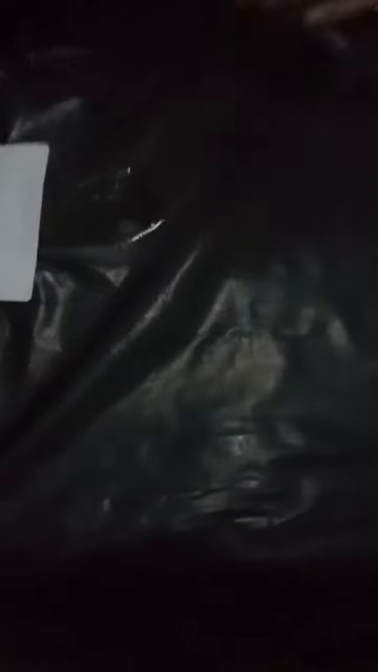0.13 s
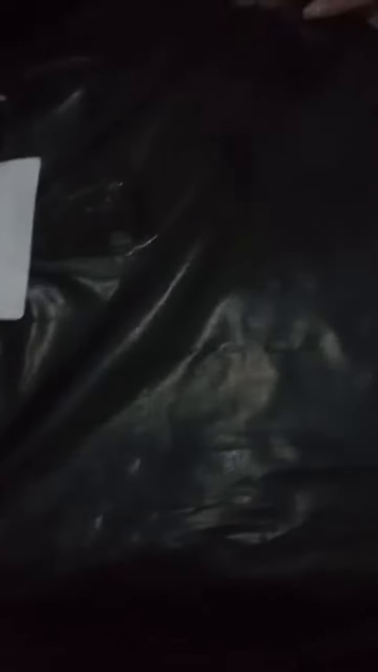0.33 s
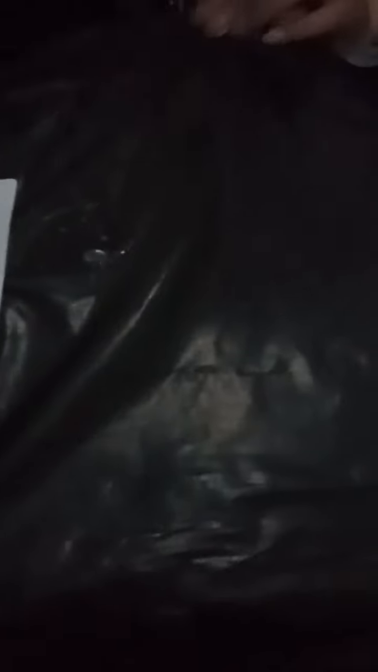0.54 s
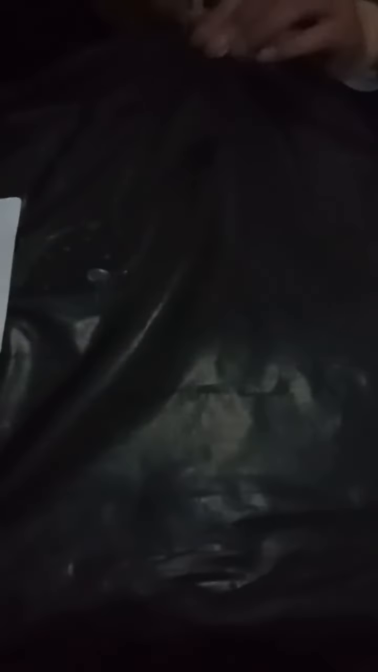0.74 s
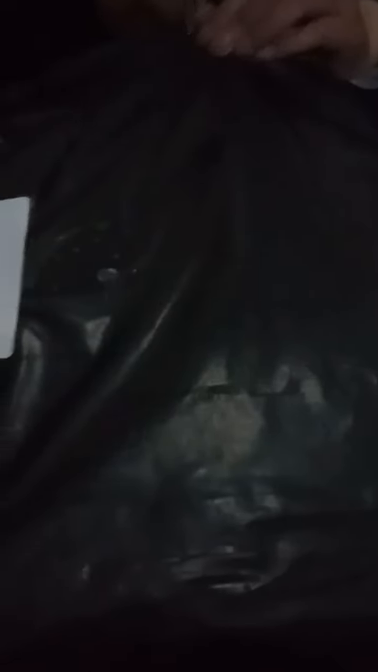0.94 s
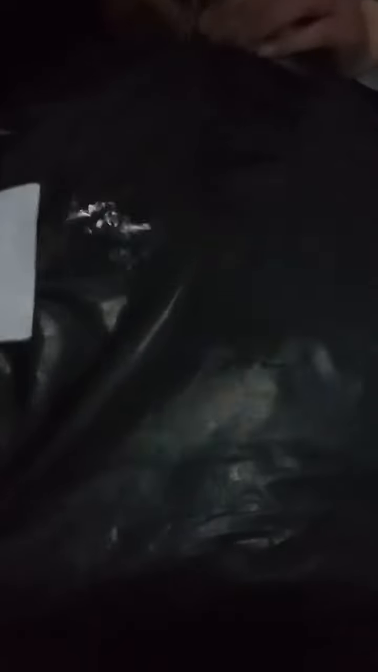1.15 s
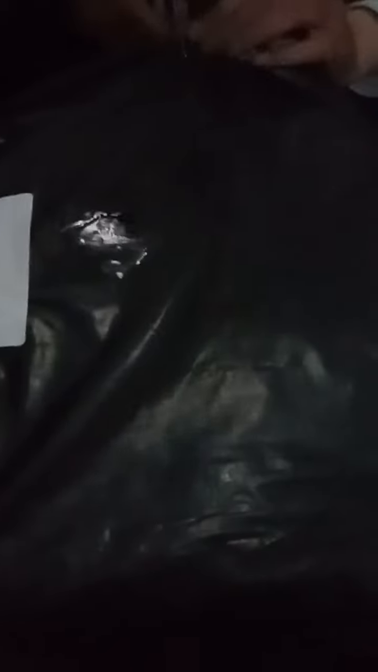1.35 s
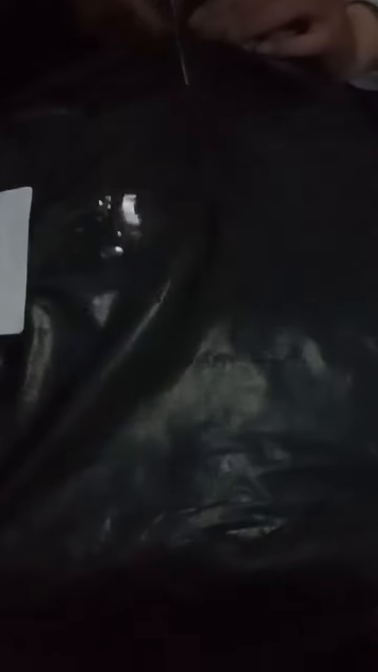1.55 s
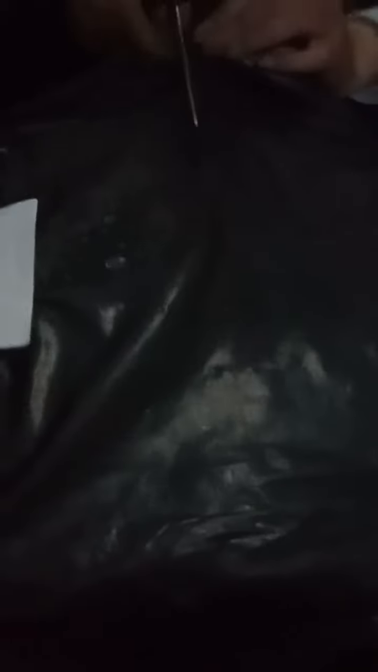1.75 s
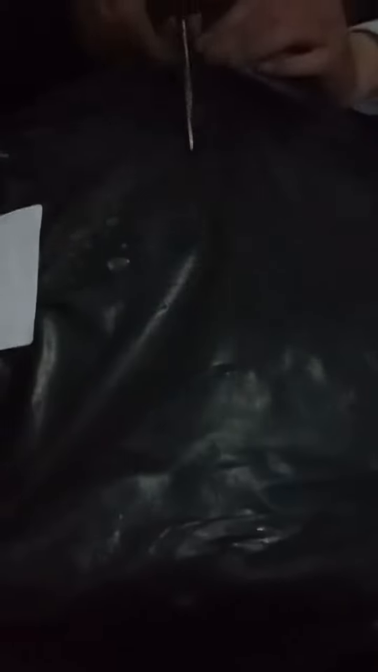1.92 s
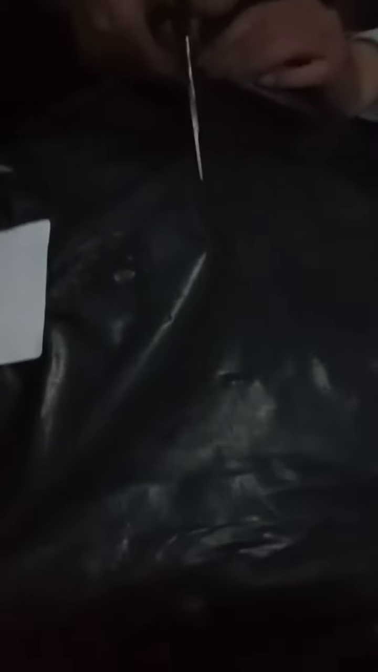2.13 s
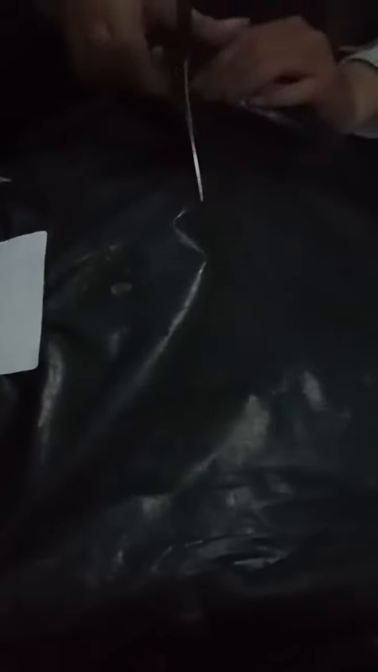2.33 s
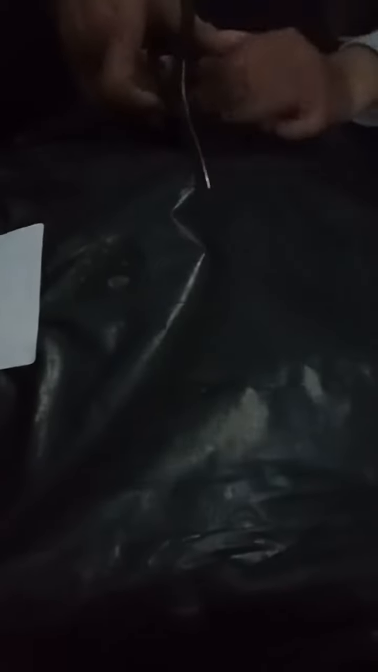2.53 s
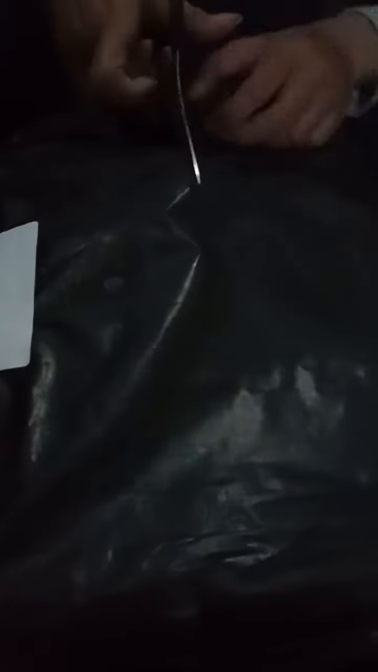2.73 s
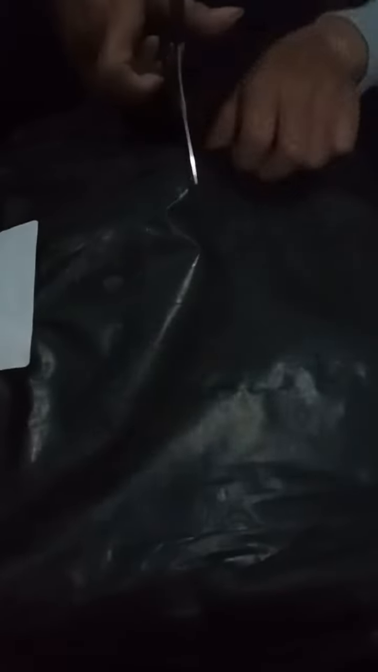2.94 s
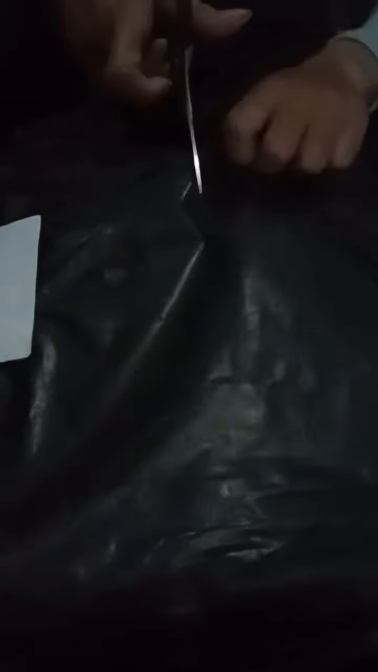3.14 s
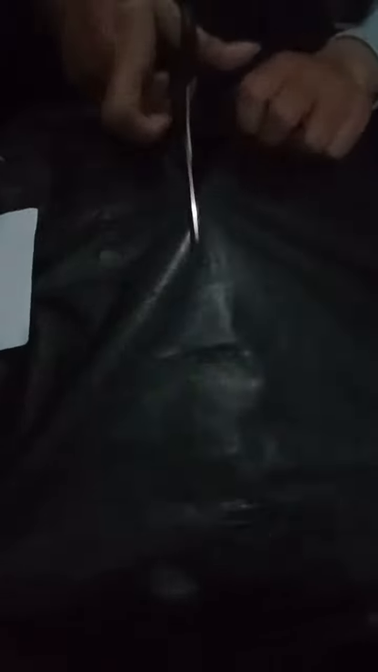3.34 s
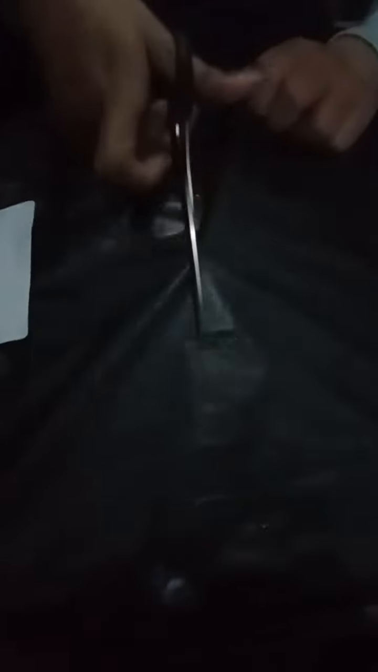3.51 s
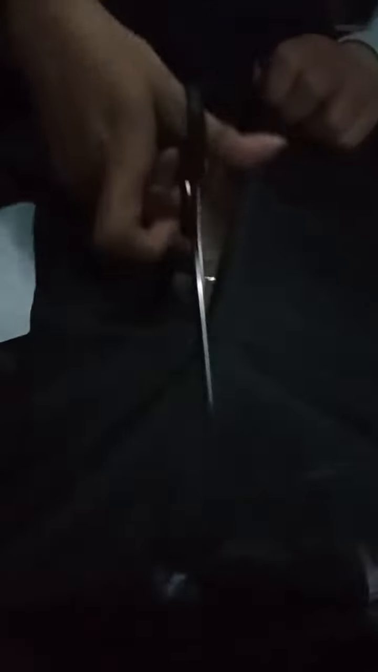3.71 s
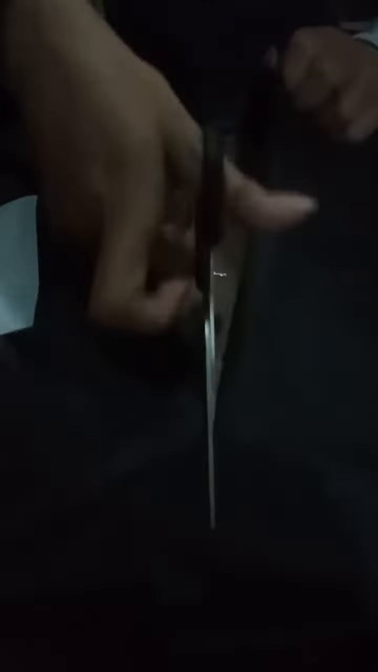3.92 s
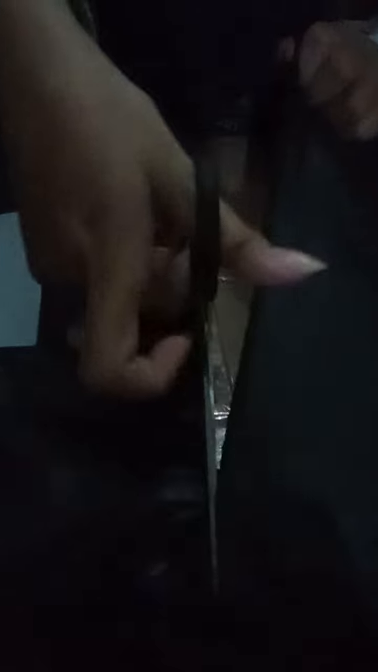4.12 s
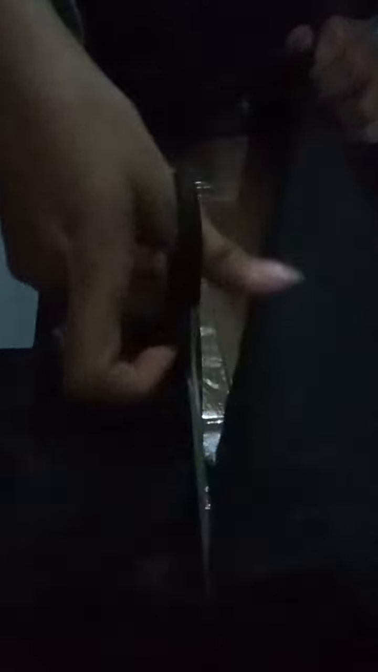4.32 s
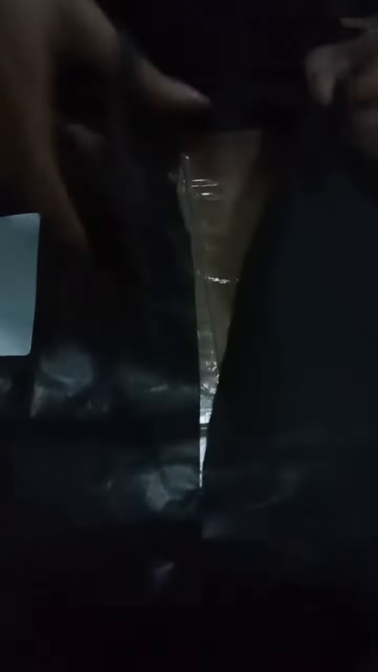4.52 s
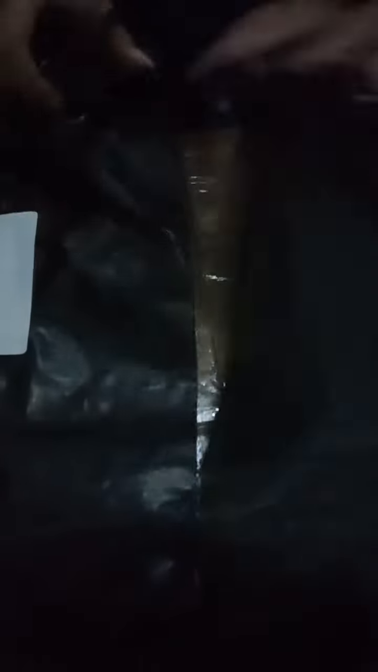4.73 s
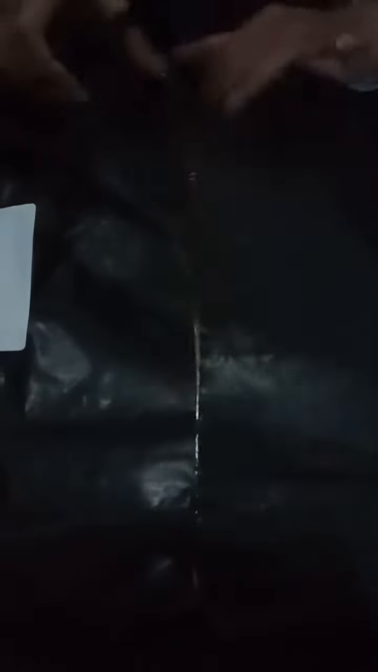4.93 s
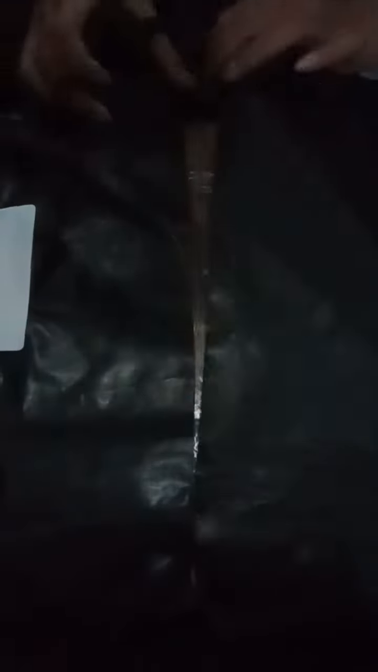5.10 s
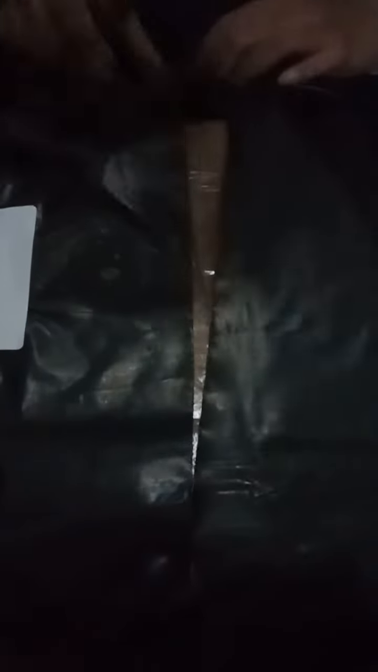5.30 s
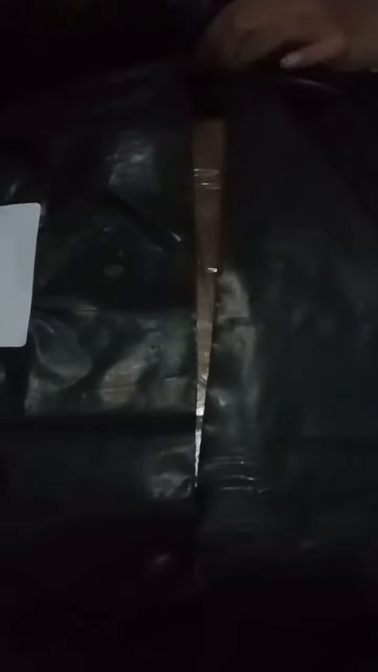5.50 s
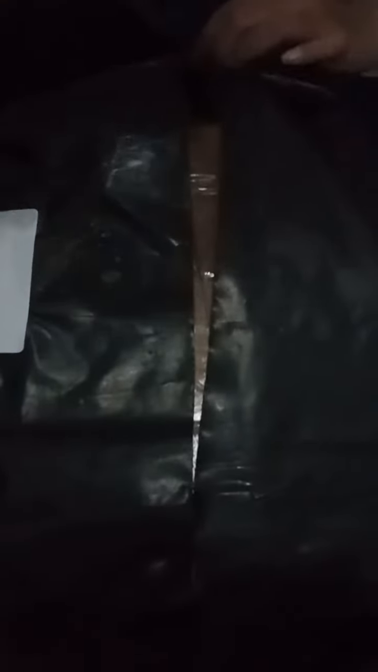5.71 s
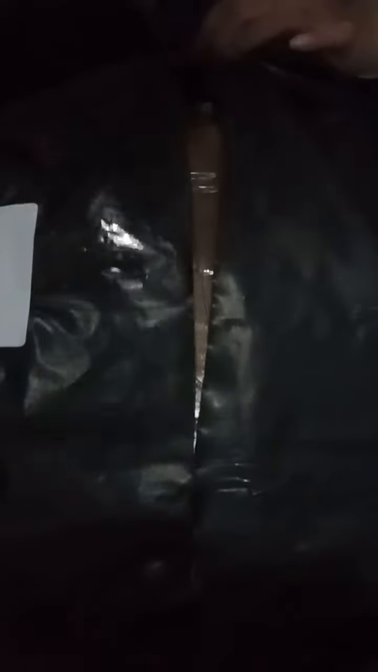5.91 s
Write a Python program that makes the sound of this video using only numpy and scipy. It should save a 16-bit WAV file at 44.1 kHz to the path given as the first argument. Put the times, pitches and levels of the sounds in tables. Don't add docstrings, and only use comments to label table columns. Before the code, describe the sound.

Crisp, high plastic crinkling in a quiet room, dry and close. First small ticks and scattered snaps from handling, a sharper burst after one second, then uneven snips of scissors. The cut runs on into a smooth hiss with thick crackle, loudest past the middle, with light taps and faint low thuds from the parcel and table. Crackles thin out, nearly stop, then briefly return.

```python
import sys
import numpy as np
from scipy import signal
from scipy.fft import rfft, irfft, next_fast_len
from scipy.io import wavfile
from scipy.ndimage import uniform_filter1d

SR = 44100
rng = np.random.default_rng(int(sys.argv[2]) if len(sys.argv) > 2 else 0)


def materialize(psi):
    bounded = np.clip(np.atleast_2d(psi).T, -1, 1)
    quanta = np.round(bounded * 32767).astype(np.int16)
    wavfile.write(sys.argv[1], SR, quanta)


def convert_level_to_amplitude(level_db):
    exponent = np.asarray(level_db, float) / 20
    return 10 ** exponent


N = 267025

# start in
# seconds, length in seconds, crackle level at the start in dB, at the end in dB.
MOVES = [(0, 0.12, -36.5, -69), (0.124, 0.18, -40.5, -43), (0.355, 0.12, -59, -52.5),
         (0.46, 0.15, -40.5, -53), (0.557, 0.26, -51, -68), (0.79, 0.11, -64, -62.5),
         (0.923, 0.059, -63.5, -66), (1.098, 0.089, -32.5, -28.5), (1.216, 0.1, -47, -54),
         (1.409, .02, -69, -70), (1.451, 0.041, -27, -33.5), (1.629, 0.25, -56, -41.5),
         (1.928, 0.096, -39, -34), (2.056, 0.055, -35, -36), (2.142, 0.035, -57, -44.5),
         (2.164, 0.14, -55, -62.5), (2.39, 0.15, -46, -36), (2.552, 0.14, -32.5, -38.5),
         (2.737, 0.19, -55.5, -59.5), (2.91, 0.083, -38.5, -35.5), (2.985, 0.046, -41, -42.5),
         (3.084, .19, -44, -31.5), (3.265, 0.11, -36.5, -34), (3.368, 0.19, -37, -35),
               (3.533, 0.16, -32.5, -44.5), (3.606, 0.27, -40.5, -39.5), (3.724, 0.06, -32, -36),
               (3.804, 0.2, -35, -24.5), (3.989, 0.11, -30.5, -29.5), (4.1, 0.09, -47.5, -49),
               (4.191, 0.11, -24, -44.5), (4.244, 0.22, -41, -35.5), (4.376, 0.21, -28.5, -32.5),
               (4.589, 0.12, -47.5, -40.5), (4.738, 0.084, -41.5, -30), (4.865, 0.087, -35.5, -37),
               (4.952, 0.069, -34, -36), (5.063, 0.11, -54, -26), (5.13, 0.14, -28, -36),
               (5.241, 0.2, -37, -37), (5.518, 0.025, -71, -62.5), (5.655, .012, -68, -64),
               (5.751, 0.017, -66, -71), (5.82, 0.18, -58.5, -58), (5.961, 0.078, -43.5, -37)]
RISE_DB_PER_S, FALL_DB_PER_S, STILL_DB = 1503, 423, -75
TAIL_DB, TAIL_DB_PER_S = -17, 330
GATE_DB, GATE_STEEPENS = -63, 2.5

# time in seconds, rub over the grains in dB.
GLIDE = [(1.75, -6.5), (1.81, 2.5), (1.93, -6), (3.1, -5), (3.3, -2), (3.45, 5), (3.7, 13), (3.8, -1.5),
         (4.2, -8.5), (5.8, -5.5), (5.86, 3), (5.97, -5)]
MOTTLE_DB = 4.5
# frequency in Hz, level in dB per Hz.
FILM = [(590, -16), (1000, -11), (1330, -3), (1700, -6), (3630, -0.5), (4930, -4), (7010, 0.5), (10200, -8),
        (12900, -24.5), (13800, -19.5), (15000, -33.5), (15600, -18.5), (16100, -41.5)]

# time in seconds, rms level of the snap's opening in dB, crease
# pitch in Hz, length in ms.
GRIP_SNAPS = [(.0152, -38.5, 7420, 1.1), (.0351, -44.5, 4170, 0.25), (.1368, -34.5, 8700, 0.87),
              (.2045, -34.5, 3590, 2.5), (.2314, -28, 7450, 2.8), (.2754, -30, 3690, 0.66),
              (.2836, -33.5, 3520, 1.7), (.3814, -47, 10100, 1.7), (.4018, -48.5, 3890, 0.61),
              (.4265, -40.5, 8200, 1.5), (.4617, -29.5, 8170, 0.079), (.5093, -35, 7300, 0.27),
              (.541, -29.5, 8100, 1), (.5503, -32.5, 8900, 1.7), (.5691, -25.5, 9700, 0.25),
              (.6, -39, 7220, 2.1), (.6292, -40, 3420, 1.4), (.6695, -43, 3900, 0.15),
              (.7036, -35, 7000, 1.04), (.8097, -34, 4120, 0.51), (.8689, -45, 7200, 0.27),
              (.9351, -59.5, 3720, 0.4), (1.0828, -20.5, 6950, 0.38), (1.187, -28.5, 6540, 1),
              (1.1805, -29.5, 6370, 0.52), (1.1972, -20.5, 7520, 0.4), (1.2597, -45.5, 6180, 1.2),
              (1.2825, -37, 7230, 2.6), (1.3022, -30.5, 7510, 0.73), (1.3206, -35.5, 3690, 0.18)]
# time in seconds, rms level of the snap's opening in dB, crease pitch in Hz, length
# in ms.
SNIP_SNAPS = [(1.435, -34, 5470, 1.1), (1.442, -27, 7410, 14), (1.4849, -22.5, 7940, 0.56),
              (1.494, -29, 7000, 4), (1.6679, -46, 6910, 0.41), (1.7761, -28.5, 7550, 0.85),
              (1.8538, -38, 7130, 1.3), (1.859, -27.5, 8720, 2.1), (1.8947, -37, 9330, 6.8),
              (1.9366, -16, 8120, 0.12), (1.973, -31.5, 10210, 3.5), (2.023, -30, 8660, 1.3),
              (2.0534, -22, 7830, 0.65), (2.0857, -31, 7670, 0.34), (2.0948, -30, 3950, 0.85),
              (2.1065, -21.5, 4660, 0.3), (2.1125, -26, 7630, 1.7), (2.1227, -33, 7050, 2.4),
              (2.1642, -43.5, 3980, 0.78), (2.2409, -47.5, 7100, 1.1), (2.2695, -45.5, 4400, 0.9),
              (2.2736, -45.5, 2347, 1.3), (2.2958, -50.5, 6700, 1.9)]
# time in seconds, rms level of the snap's opening in dB, crease pitch in Hz,
# length in ms.
TAUT_SNAPS = [(2.454, -30.5, 7100, 0.23), (2.4921, -21, 10500, 0.5), (2.499, -24.5, 7360, 2.2),
              (2.5448, -27, 7110, 3.5), (2.6244, -28.5, 7760, 1.1), (2.6378, -28.5, 7140, 1.5),
              (2.7072, -21, 7230, 0.21), (2.7688, -36, 3790, 0.6), (2.8133, -52.5, 6550, 1.3),
              (2.968, -24.5, 4410, 0.29), (3.0294, -23.5, 6870, 0.37), (3.097, -34, 8660, 1.4),
              (3.105, -35.5, 6650, 0.89), (3.1243, -28, 8790, 2.2), (3.145, -32, 7790, 1.2),
              (3.1824, -33, 8100, 0.47), (3.3458, -20, 7000, 1.9), (3.497, -18.5, 7130, 0.049),
              (3.712, -22.5, 8300, 5.5), (3.7613, -13.5, 7750, 0.49), (3.7775, -18.5, 7530, 0.66),
              (3.8, -21, 3900, 0.44), (3.8075, -24, 5470, 0.8), (3.8335, -22, 6820, 0.49),
              (3.8713, -19, 3450, 2.6), (3.888, -24.5, 7320, 9.4)]
# time in seconds, rms level of the snap's opening in dB, crease pitch in Hz,
# length in ms.
SLIDE_SNAPS = [(3.915, -23, 7320, 0.34), (3.9727, -17, 7220, 0.45), (3.9851, -19.5, 7070, 1.4),
               (3.993, -16.5, 6900, 0.52), (4.0208, -17, 7210, 0.62), (4.0519, -17.5, 8080, 0.35),
               (4.08, -16.5, 7520, 0.81), (4.1399, -34, 3710, 1.6), (4.1494, -36, 1122, 0.48),
               (4.184, -23.5, 4900, 12), (4.189, -16, 7360, 7.9), (4.2276, -23.5, 7110, 0.63),
               (4.2786, -28, 8050, 0.49), (4.3368, -24.5, 5380, 1.6), (4.3561, -23.5, 3763, 1.8),
               (4.3685, -21.5, 6580, 1.2), (4.387, -20.5, 6660, 0.92), (4.4023, -14.5, 7690, 1.2),
               (4.4133, -21.5, 3830, 2.5), (4.4306, -14, 7430, 0.63), (4.473, -21, 7000, 0.32),
               (4.5106, -18.5, 5340, 0.62), (4.5273, -24.5, 5220, 2.2), (4.55, -20.5, 7620, 0.68),
               (4.578, -29.5, 7340, 1.8)]
# time in seconds, rms level of the snap's opening in dB, crease pitch in Hz, length
# in ms.
OPEN_SNAPS = [(4.6402, -38, 7440, 0.47), (4.6649, -23.5, 6980, 2.2), (4.6884, -25.5, 6870, 0.67),
              (4.704, -28, 4000, 0.18), (4.7476, -27, 6770, 2.4), (4.7679, -26, 7840, 2.1),
              (4.8279, -33, 5320, 2.1), (4.8725, -23.5, 7600, 1.2), (4.9336, -32.5, 5690, .49),
              (4.9489, -30, 7880, 2.2), (4.999, -25, 9030, 0.64), (5.108, -36, 2465, .67),
              (5.145, -28.5, 5980, 9.3), (5.1752, -22.5, 4000, 0.4), (5.1887, -17, 7760, 0.57),
              (5.2183, -22.5, 7390, 0.25), (5.2537, -31.5, 7280, 0.5), (5.3739, -25, 9950, 0.32),
              (5.4, -28, 8480, 0.64), (5.4355, -22, 5410, 2.5), (5.4847, -32, 6400, 0.29),
              (5.5244, -50, 7180, 4), (5.6545, -54.5, 6800, 2), (5.792, -63.5, 8970, .64),
              (5.8255, -44.5, 3660, 0.62), (5.88, -45.5, 9720, 1.5), (5.9605, -42, 7340, 2.2),
              (5.9897, -32.5, 8300, 0.74), (6.0131, -25, 8460, 1.5), (6.041, -32, 3790, 0.77)]
# time in seconds,
# rms level of the tick's opening in dB, crease pitch in Hz.
TICKS = [(0.06, -57.5, 6860), (0.088, -54.5, 3750), (0.1098, -44.5, 8000), (0.148, -38.5, 4000),
         (0.166, -33, 9800), (0.215, -40, 3000), (0.241, -36.5, 3400), (0.2569, -48.5, 3530),
         (0.272, -41, 7530), (0.2914, -40, 4090), (0.3102, -52.5, 7410), (0.3294, -46, 3450),
         (0.3446, -51, 3040), (0.374, -51, 6780), (0.485, -33, 6880), (0.5586, -34.5, 3330),
         (0.641, -44.5, 3846), (0.66, -45.5, 3690), (0.6867, -57.5, 3380), (0.8833, -48.5, 9680),
         (0.9496, -60, 8600), (1.1308, -29.5, 7800), (1.137, -33, 7030), (1.1696, -22.5, 8130),
         (1.2448, -45.5, 5800), (1.4162, -63.5, 7030), (1.4717, -32.5, 7780), (1.7067, -44, 6600),
         (1.7354, -50.5, 4480), (1.7681, -40, 8890), (1.8464, -38, 7520), (2.071, -26.5, 8550),
         (2.152, -48, 3850), (2.2226, -45, 7050), (2.3674, -62.5, 4000), (2.442, -38.5, 3800),
         (2.4736, -43, 3790), (2.5134, -35.5, 6860), (2.5791, -27, 7500), (2.5934, -30.5, 7090),
         (2.6547, -33.5, 7280), (2.701, -29.5, 7700), (2.7484, -45.5, 4200), (2.7616, -37, 7310),
         (2.8639, -51.5, 3480), (2.896, -44.5, 6290), (2.9302, -35.5, 7070), (2.9626, -40.5, 3405),
         (2.983, -32.5, 5970), (3.0199, -35.5, 5900), (3.0615, -43.5, 2690), (3.0665, -40.5, 5300),
         (3.0901, -44, 6800), (3.1509, -30.5, 4310), (3.1895, -35, 2900),
         (3.2437, -29, 8600), (3.2619, -29, 7000), (3.3031, -28.5, 5190), (3.3183, -27.5, 7630),
              (3.3225, -29, 7500), (3.4318, -30, 2090), (3.4438, -25.5, 8300), (3.569, -20.5, 7200),
              (3.5755, -31.5, 6600), (3.7511, -36, 6200), (3.884, -24.5, 3600), (3.9524, -20, 6630),
              (4.0047, -24, 7400), (4.0262, -18.5, 7000), (3.4835, -33, 4700), (4.0651, -22.5, 8400),
              (4.0701, -31.5, 3470), (4.1098, -41.5, 6300), (4.1275, -45, 3600), (4.3018, -35, 6580),
              (4.3155, -36, 7100), (4.3497, -23.5, 8100), (4.3834, -22.5, 7900), (4.4622, -27.5, 7400),
              (4.4931, -32.5, 7000), (4.5999, -41, 7240), (4.6301, -42, 3600), (4.6485, -33.5, 6600),
              (4.7895, -33, 6320), (4.7974, -34.5, 7100), (4.8057, -33.5, 7500), (4.8119, -36, 7700),
              (4.8386, -30, 6500), (4.8887, -37, 7200), (4.9154, -35, 8700), (5.0112, -36, 6660),
              (5.204, -33, 3600), (5.2504, -38.5, 7510), (5.2651, -34, 8250), (5.3499, -35, 7100),
              (5.3711, -37, 7100), (5.3844, -27.5, 8520), (5.4303, -27.5, 7300), (5.4545, -37, 7180),
              (5.4767, -43, 7000), (5.6273, -70.5, 7560), (2.683, -35.5, 2300), (5.8396, -43, 5700),
              (5.9137, -46, 4300), (5.9451, -44, 10200), (5.9745, -40, 6090), (6.0179, -35.5, 7650)]
TICK_MS = 0.99

# frequency in Hz, time to fall 60 dB in
# seconds.
RIDGE = [(1290, 0.046), (1450, 0.053)]
# time in seconds, level in dB.
RIDGE_LEVEL = [(0.9, -70), (1.7, -68), (4.3, -69), (5.2, -76)]

POCKET_HZ = [307, 430, 602.5, 737, 806, 925]
# start in seconds, length in seconds, level in dB, pocket pitch in Hz.
SQUEEZES = [(0, 0.028, -67, 890), (0.133, 0.11, -57, 730), (1.097, 0.11, -46.5, 810),
            (1.24, 0.034, -70, 637), (1.44, 0.047, -45, 700), (1.942, 0.02, -48.5, 740),
            (2.054, 0.048, -45, 730), (2.154, 0.082, -73, 830), (2.399, 0.086, -49, 740),
            (2.511, 0.15, -55, 765), (2.956, 0.1, -64, 800), (3.25, 0.046, -50, 700),
            (3.412, 0.02, -49.5, 680), (3.747, 0.31, -46.5, 930), (3.996, 0.11, -38.5, 470),
            (4.175, 0.061, -40, 760), (4.379, 0.068, -41.5, 670), (4.454, 0.05, -45, 540),
            (4.781, 0.083, -53.5, 383), (5.146, 0.075, -45.5, 800), (5.306, 0.11, -62, 630),
            (5.992, 0.028, -59, 417)]
POCKET_REST_DB, POCKET_FADE_DB_PER_S = -27, 397.5
PRESS_DB_PER_S = 2500
NARROW_DB_PER_OCTAVE, HARD_DB, BLURS_PER_DB = 11.5, -47.5, 1

# start in seconds, length in seconds, level in dB.
LEANS = [(0, 0.045, -66), (1.08, 0.058, -54.5), (1.462, 0.018, -53.5), (1.86, 0.031, -63),
         (1.944, 0.014, -51), (2.046, 0.073, -54.5), (2.42, 0.018, -66), (2.506, 0.084, -58.5),
         (2.624, 0.11, -69), (2.912, 0.067, -62), (3.4, 0.024, -66), (3.756, 0.13, -62.5),
         (3.988, 0.027, -62), (4.197, 0.022, -46), (4.382, 0.017, -55), (4.804, 0.068, -62),
         (5.206, 0.082, -60)]
# frequency in Hz, level in dB per Hz.
TABLE = [(24, -66), (40, -42), (79, 6.5), (184, 10.5), (243, -7.5), (300, -8.5), (420, -8.5), (660, -120)]
TABLE_REST_DB, TABLE_REST_LAGS, TABLE_FADE_DB_PER_S = -39, 0.32, 314

# frequency in Hz, level in dB per Hz.
HISS = [(15, -31.5), (25, 1), (800, -19), (1650, -38), (6000, -36), (7000, -16), (16000, -22)]
HISS_DB = -90

# start in seconds, length in
# seconds, level in dB, pitch in Hz.
HUMS = [(0.18, 0.078, -63, 435), (0.182, .11, -64, 718), (1.147, 0.016, -63, 433), (1.24, 0.085, -73, 607),
        (2.16, 0.1, -66.5, 844), (2.418, .06, -74, 430), (3.214, 0.05, -62, 626), (3.216, 0.36, -75, 430),
        (4.005, 0.095, -49, 350), (4.008, 0.048, -45, 205), (4.468, 0.14, -76, 423),
        (4.78, 0.058, -79, 430), (5.137, 0.1, -67.5, 423), (2.401, 0.033, -56, 640),
        (5.506, 0.047, -88, 1460), (5.655, 0.023, -87.5, 1382), (5.66, 0.03, -96, 2000),
        (5.752, .008, -93, 3350), (1.34, 0.098, -87, 1320), (5.835, .015, -75, 1460)]

# time in seconds, peak level in dB, pitch in Hz.
KNOCKS = [
    (1.0817, -43, 485),
    (4.07, -25, 1090),
    (4.147, -25, 800),
    (4.191, -25.5, 814),
    (4.355, -16.5, 1580),
    (4.411, -25.5, 610),
    (2.703, -37, 1150),
    (4.413, -32, 178),
    (4.948, -26, 1450),
    (5.434, -35.5, 1400),
]
KNOCK_CYCLES = 2.8

SHIVER_S, SHIVER_GAP_S, SHIVER_HZ, SHIVER_DB = 2.178, .0056, 3400, -47
CREAK_S, CREAK_GAP_S, CREAK_QUICKENS, CREAK_HZ, CREAK_DB = 2.3825, .0118, .82, 3750, -39


def rms_one(x):
    return x / np.sqrt(np.mean(x ** 2) + 1e-20)


def in_time(rows):
    s, *columns = np.transpose(rows)
    return [np.interp(np.arange(N) / SR, s, c) for c in columns]


def colour(x, spectrum):
    size = next_fast_len(x.shape[-1] + 4096) // 2 * 2
    hz, db = np.transpose(spectrum)
    grid = np.maximum(np.arange(size // 2 + 1) * SR / size, 1)
    log_gain = np.interp(np.log(grid), np.log(hz), db) * np.log(10) / 20
    cepstrum = irfft(log_gain, size)
    cepstrum[1:size // 2] *= 2
    cepstrum[size // 2 + 1:] = 0
    return irfft(rfft(x, size) * np.exp(rfft(cepstrum)), size)[..., :x.shape[-1]]


def ring(clicks, hz, t60):
    r = convert_level_to_amplitude(-60 / (t60 * SR))
    w = 2 * np.pi * hz / SR
    return signal.lfilter([0, np.sin(w)], [1, -2 * r * np.cos(w), r * r], clicks + 1e-18)


def drift(rate):
    r = np.exp(-2 * np.pi * rate / SR)
    noise = rng.standard_normal(N + SR)
    return rms_one(signal.lfilter([1], [1, -2 * r, r * r], noise)[SR:])


def ramps(start, length, first_db, last_db, rise, fall):
    t = np.arange(0, N + 32, 32)[None] / SR - start[:, None]
    length = length[:, None]
    held_db = first_db[:, None] + np.clip(t / length, 0, 1) * (last_db - first_db)[:, None]
    return held_db + rise * np.minimum(t, 0) - fall * np.maximum(t - length, 0)


def full(coarse):
    return np.interp(np.arange(N) / 32, np.arange(len(coarse)), coarse)


def work():
    moves = ramps(*np.transpose(MOVES), RISE_DB_PER_S, FALL_DB_PER_S)
    db = np.maximum(moves.max(axis=0), STILL_DB)
    gated = full(db - GATE_STEEPENS * np.maximum(GATE_DB - db, 0))
    slope = TAIL_DB_PER_S * np.arange(N) / SR
    tail = np.maximum.accumulate(gated + slope) - slope + TAIL_DB
    return np.maximum(gated, tail)


def grains(per_s, spread_db, clump_db, clump_rate):
    sizes = convert_level_to_amplitude(spread_db * np.minimum(rng.exponential(1, N), 2.5)) * rng.choice([-1, 1], N)
    chance = per_s * convert_level_to_amplitude(clump_db * drift(clump_rate)) / SR
    return sizes * (rng.random(N) < chance)


def crackle(level_db, rub_db):
    clicks = rms_one(grains(1600, spread_db=5.5, clump_db=7.0, clump_rate=90))
    dealt = rng.integers(0, 24, N)
    rub = convert_level_to_amplitude(rub_db + 1.9 * drift(110)) * rng.standard_normal((2, N)) / 5
    mix = np.zeros(N)
    for k, hz in enumerate(np.geomspace(1200, 15000, 24)):
        tilt = convert_level_to_amplitude(0.5 * rub_db * np.log2(hz / 4000)) * hz ** 1.546
        grain_patch = convert_level_to_amplitude(3.13 * drift(7.9)) * ring(clicks * (dealt == k), hz, 11.7 / hz)
        rub_patch = convert_level_to_amplitude(MOTTLE_DB * drift(12.0) - 4.0) * ring(rub[k % 2], hz, 51.0 / hz)
        mix += tilt * (grain_patch + rub_patch)
    evened = mix / np.sqrt(1 + convert_level_to_amplitude(2 * rub_db))
    return convert_level_to_amplitude(level_db - 2.5) * rms_one(colour(evened, FILM))


def snaps(table):
    out = np.zeros(N + 4096)
    ms = np.arange(4096) / SR * 1000
    slips = rng.standard_normal((len(table), len(ms)))
    for (s, level_db, hz, length_ms), slip in zip(table, slips):
        swell = 0.093 + 0.021 * length_ms
        burst = np.sin(np.pi * np.clip(ms / (2.0 * length_ms), 0, 1) ** swell)
        rattle, echoes = convert_level_to_amplitude(-10 - 3.2 * ms), convert_level_to_amplitude(-28.0 - 0.93 * ms)
        push = slip * (burst + (rattle + echoes) * np.clip(ms / length_ms, 0, 1))
        push[int(length_ms * 9)] += 1.94 / length_ms
        edge = convert_level_to_amplitude(7.5 + 0.089 * (level_db + 35.0)) * np.diff(push, 2, prepend=[0, 0])
        thin = signal.lfilter([1, -1], [1, -np.exp(-2 * np.pi * 0.38 * hz / SR)], push)
        song = hz / 4000 * ring(push, hz, 11.76 / hz)
        sung = colour(thin + edge + song, FILM)
        early = ms < length_ms + .7
        at = max(round((s - .0004) * SR), 0)
        out[at:at + len(ms)] += convert_level_to_amplitude(level_db) * sung / np.sqrt(np.mean(sung[early] ** 2))
    return out[:N]


def ridge(film, work_db):
    lingering = signal.lfilter([.0015], [1, -.9985], convert_level_to_amplitude(0.9 * work_db - 6.0))
    shake = film + convert_level_to_amplitude(-9.0 + 9.8 * drift(29)) * lingering * rng.standard_normal(N)
    rung = sum(ring(ring(shake, hz, t60), hz, 0.0086) for hz, t60 in RIDGE)
    return rung * convert_level_to_amplitude(in_time(RIDGE_LEVEL)[0])


def pushes(film, work_db):
    jolts = np.minimum(np.abs(film) / convert_level_to_amplitude(work_db) + .5, 5.0)
    return rms_one(jolts * rng.standard_normal(N))


def squeeze(work_db):
    start, length, db, hz = np.transpose(SQUEEZES)
    rows = ramps(start, length, db, db, PRESS_DB_PER_S, POCKET_FADE_DB_PER_S)
    level_db = np.maximum(full(rows.max(axis=0)), work_db + POCKET_REST_DB)
    pitch_hz = full(uniform_filter1d(hz[rows.argmax(axis=0)], size=15))
    return level_db, pitch_hz


def air_pocket(shoves, level_db, pitch_hz):
    narrow = NARROW_DB_PER_OCTAVE - BLURS_PER_DB * (level_db - HARD_DB)
    narrow = np.clip(narrow, 3, NARROW_DB_PER_OCTAVE)
    modes = np.zeros(N)
    for hz in POCKET_HZ:
        mode_db = -narrow * np.abs(np.log2(hz / pitch_hz)) + 3 * drift(6)
        modes += convert_level_to_amplitude(mode_db) * rms_one(ring(ring(shoves, hz, .012), hz, .03))
    return convert_level_to_amplitude(level_db - 9.0) * modes


def lean(work_db):
    start, length, db = np.transpose(LEANS)
    rest_db = work_db + TABLE_REST_DB - TABLE_REST_LAGS * (np.maximum(work_db, -60) + 33.0)
    rows = ramps(start, length, db, db, PRESS_DB_PER_S, TABLE_FADE_DB_PER_S)
    return np.maximum(full(rows.max(axis=0)), rest_db)


def table_thud(shoves, level_db):
    return convert_level_to_amplitude(level_db) * rms_one(colour(shoves, TABLE))


def microphone_hiss():
    return convert_level_to_amplitude(HISS_DB) * rms_one(colour(rng.standard_normal(N), HISS))


def hums(shoves):
    start, length, db, hz = np.transpose(HUMS)
    rows = ramps(start, length, db, db, 1200.0, POCKET_FADE_DB_PER_S)
    out = np.zeros(N)
    for row, f in zip(rows, hz):
        fold = rms_one(ring(ring(shoves, f, .018), f, .035))
        out += convert_level_to_amplitude(full(row) + 2.1 * drift(18)) * fold
    return out


def knocks():
    out = np.zeros(N)
    for s, level_db, hz in KNOCKS:
        blow = np.zeros(2048)
        blow[0] = 1
        blow[int(.45 * SR / hz)] -= .9
        rung = ring(np.diff(blow, prepend=0), hz, KNOCK_CYCLES / hz)
        rung = ring(rung, hz * 1.28, 3.0 / hz)
        at = int(s * SR)
        out[at:at + len(blow)] += convert_level_to_amplitude(level_db) * rung / np.abs(rung).max()
    return out


def shiver(count):
    return [(SHIVER_S + SHIVER_GAP_S * k, SHIVER_DB, SHIVER_HZ, .7) for k in range(count)]


def creak(count):
    gaps = CREAK_GAP_S * CREAK_QUICKENS ** np.arange(count - 1)
    times = CREAK_S + np.cumsum(np.r_[0, gaps])
    return [(at, CREAK_DB + 0.95 * k, CREAK_HZ, .8) for k, at in enumerate(times)]


def scene():
    work_db = work()
    rub_db = in_time(GLIDE)[0]
    film = crackle(work_db, rub_db)
    for rows in (GRIP_SNAPS, SNIP_SNAPS, TAUT_SNAPS, SLIDE_SNAPS, OPEN_SNAPS):
        film += snaps(rows)
    film += snaps([(*row, TICK_MS) for row in TICKS])
    film += snaps(shiver(count=7) + creak(count=7))
    film = signal.sosfilt(signal.butter(7, 1080, "high", fs=SR, output="sos"), film)
    shoves = pushes(film, work_db)
    pocket_db, pocket_hz = squeeze(work_db)
    lows = air_pocket(shoves, pocket_db, pocket_hz) + table_thud(shoves, lean(work_db))
    lows += hums(shoves) + knocks()
    return (film + ridge(film, work_db) + lows + microphone_hiss())[None]


def low_pass(x):
    return signal.sosfilt(signal.butter(12, 16800, fs=SR, output="sos"), x)


def record(dry):
    dipped = .45 * dry + .55 * signal.lfilter(*signal.iirnotch(1660, 7.0, SR), dry)
    bass_cut = signal.butter(2, 70, "high", fs=SR, output="sos")
    top_cut = signal.cheby2(8, 40, 16900, fs=SR, output="sos")
    mix = signal.sosfilt(np.vstack([bass_cut, top_cut]), dipped)
    return low_pass(mix)


dry = scene()
out = record(dry)
materialize(out)
```